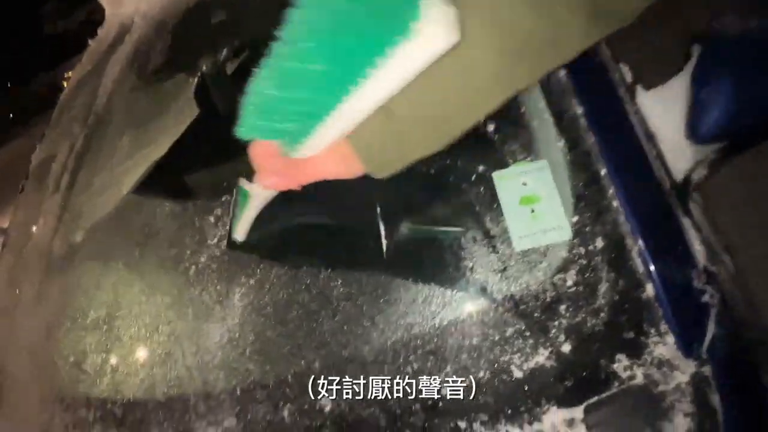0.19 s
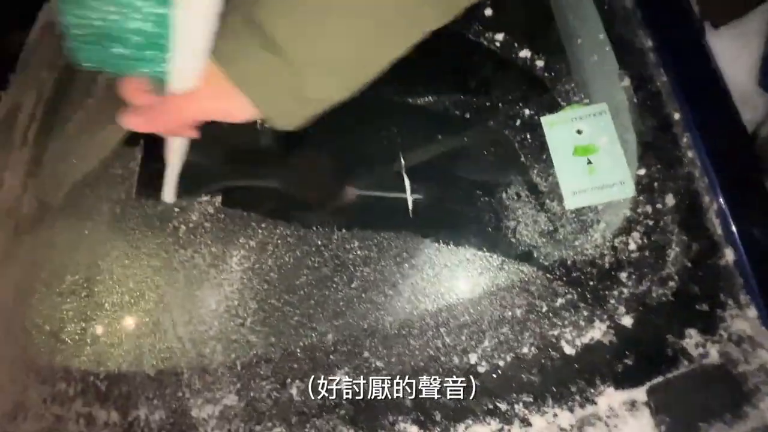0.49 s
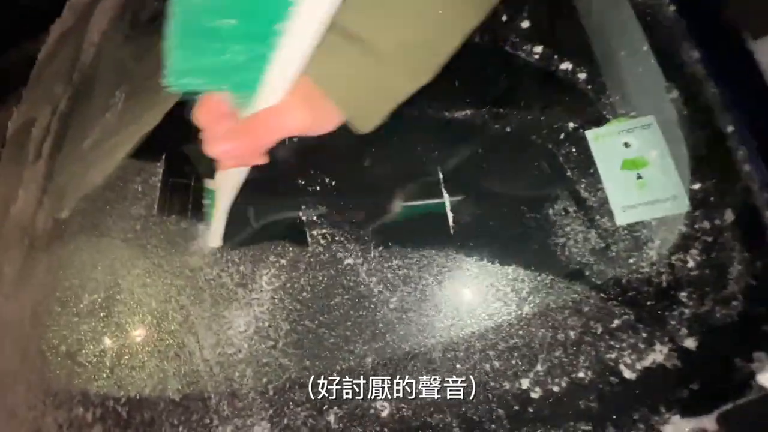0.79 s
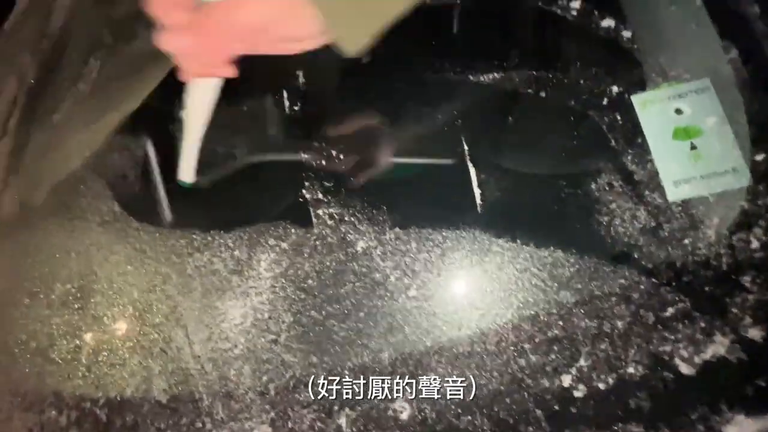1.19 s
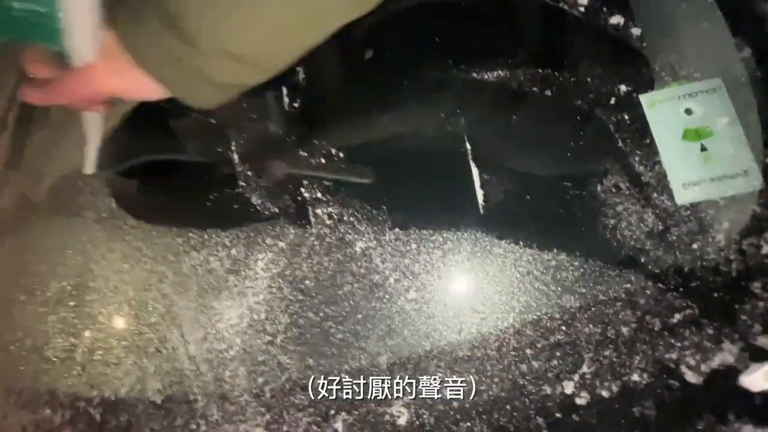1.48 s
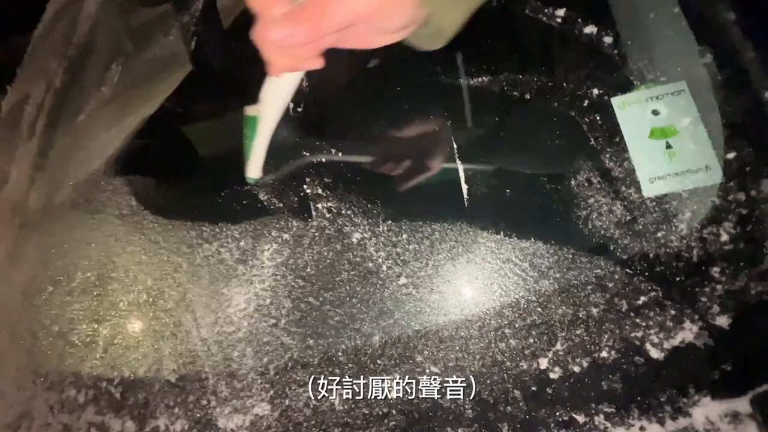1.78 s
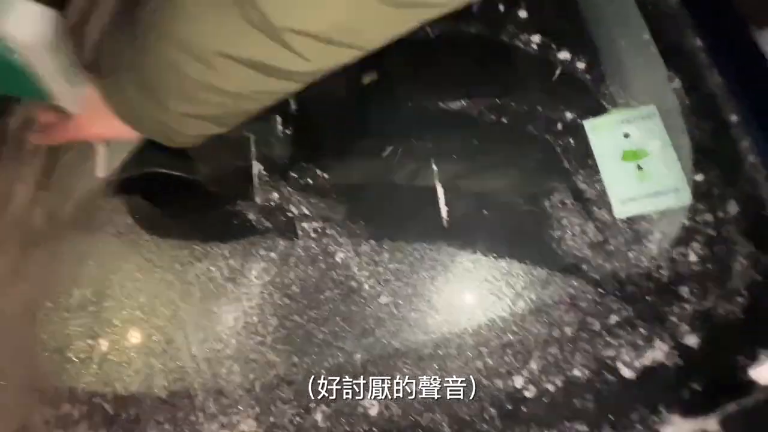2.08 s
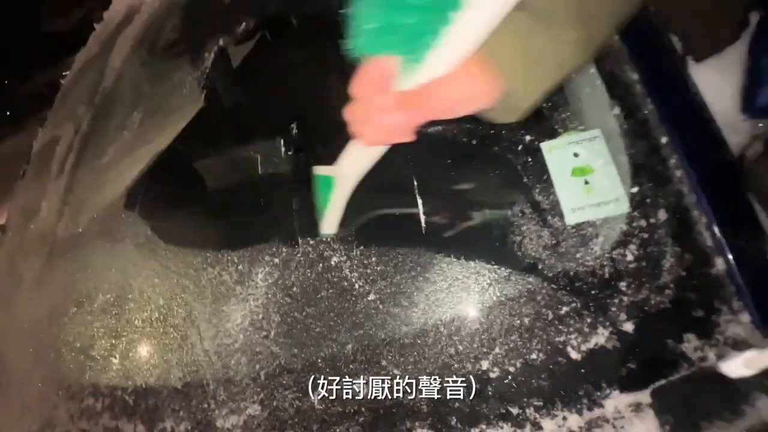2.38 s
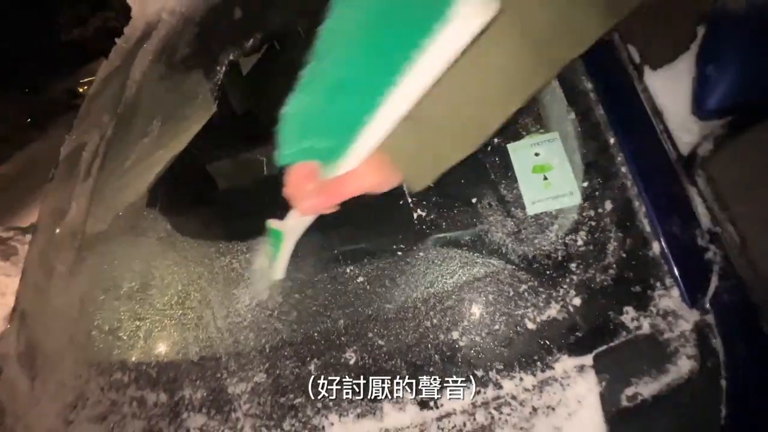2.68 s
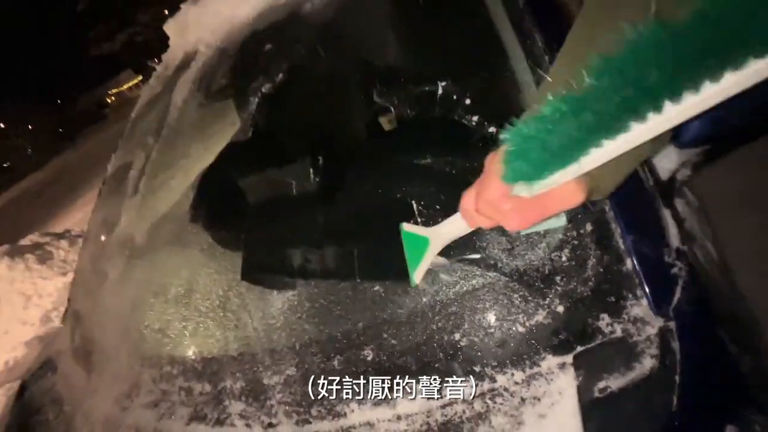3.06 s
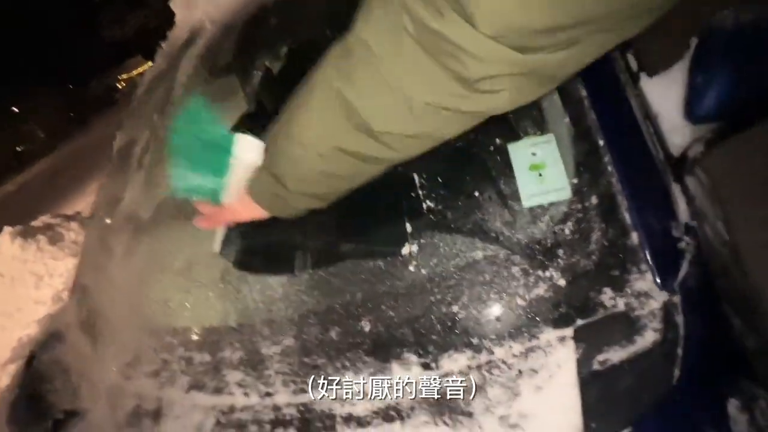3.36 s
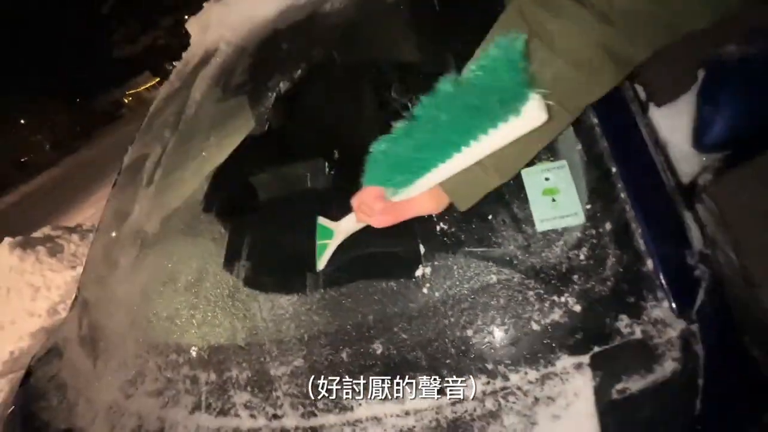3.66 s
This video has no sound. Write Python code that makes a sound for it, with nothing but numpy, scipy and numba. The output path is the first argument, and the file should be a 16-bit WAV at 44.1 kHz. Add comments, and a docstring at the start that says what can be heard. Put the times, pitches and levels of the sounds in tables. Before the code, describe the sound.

Close, dry stereo scraping of frost from car glass: fast gritty bursts with small cracking chips, weaker midway, sharpest near three seconds, ending shortly after three and a half. A steady low idle and soft outdoor rumble continue.

```python
"""Scraping frost off a windshield

A plastic scraper crosses the frost in short strokes, an arm's length from a phone.
Each stroke is a dense stream of random grains, cracking crystals, that ring the blade and shake the glass.
Chips tick in and between the strokes: bursts of noise that ring at their own pitch and die at once.
A car engine idles underneath as a few wavering tones; filtered noise makes street rumble and faint hiss."""
import sys
import numpy as np
from scipy import signal
from scipy.fft import rfft, irfft
from scipy.io import wavfile
from scipy.ndimage import uniform_filter1d
from numba import njit

SR = 44100
rng = np.random.default_rng(int(sys.argv[2]) if len(sys.argv) > 2 else 0)


def materialize(psi):
    """Save the field psi as 16-bit PCM at rate SR to the path in sys.argv[1].

    A 1-D psi becomes a single channel; in a 2-D psi each row is a channel.
    """
    bounded = np.clip(np.atleast_2d(psi).T, -1, 1)
    quanta = np.round(bounded * 32767).astype(np.int16)
    wavfile.write(sys.argv[1], SR, quanta)


N = 167580

# "Mid" is what both port signals share; "side" is what is opposed between them.

# Pitches of the idling engine. Each row: multiple of the firing rate, level in dB before the overall level.
IDLE_TONES = [(1, -15.5), (2, 2), (3, -3), (4, -13), (5, -34)]
IDLE_HZ, IDLE_DB, IDLE_WOBBLE = 35.29, -35.5, 0.00906  # firing rate, overall level, wobble as a share of the rate

# Tone colour of the street, shared and opposed. Each row: frequency in Hz, filter gain in dB.
STREET_MID = [(20, -28), (45, -0.5), (90, 0.5), (130, -1), (240, -3.5), (330, -7), (410, -6.5), (500, -17),
              (1500, -25.5), (2200, -59)]
STREET_SIDE = [(32, -21), (55, -12), (251, -5.5), (466, -4.5), (524, -7.5), (949, -9), (1020, -16.5),
               (4880, -23.5), (6810, -36), (10900, -21), (16000, -31)]
STREET_DB, STREET_SIDE_DB = -42, -48.5

# Tone colour of the faint hiss. Each row: frequency in Hz, filter gain in dB.
HISS_COLOUR = [(710, -18), (1200, -19.5), (1940, 7.5), (2360, -3.5), (2560, -1), (5250, -6.5), (6090, -2.5),
               (10900, -6), (13000, -28.5)]
# Level of the faint hiss over time. Each row: time in seconds, level in dB.
HISS_LEVEL = [(0.0, -57.5), (0.22, -44.5), (0.44, -52), (0.54, -59.5), (0.87, -40), (0.97, -54.5),
              (1.24, -54.5), (1.68, -56), (1.95, -54), (2.87, -52), (2.98, -69), (3.16, -45.5), (3.3, -59),
              (3.8, -54)]

# Scraper strokes, a list of rows for each. Each row: time in seconds, rasp level in dB,
# glass rumble level in dB, treble in dB against the rasp, low middle in dB against the rasp,
# main blade ring in Hz, upper body in dB against the rasp.
STROKES = [
    [(0.2, -102, -50, -18, -15, 2130, -14), (0.22, -27, -43, 7.5, -5.5, 2020, -3.5),
     (0.234, -28.5, -24.5, 1, -11, 2150, -17), (0.254, -39.5, -32, 9.5, 0, 2030, 7),
     (0.272, -38, -41, 6, -2, 1940, -2), (0.31, -34.5, -28, 4, -1.5, 2100, -0.5),
     (0.376, -42.5, -28.5, 5, 2, 1980, 5.5), (0.392, -85, -52, -8, 32, 2280, -10)],
    [(0.434, -51, -54, 7, -1, 2040, 5), (0.466, -32, -28, 7.5, -3.5, 1910, 0),
     (0.494, -42, -32, 8.5, 1.5, 2400, 7.5), (0.568, -23, -25.5, 2.5, 2, 2220, -7),
     (0.584, -51.5, -35, 13.5, -4, 2340, -1), (0.61, -36, -33, 3, 0, 2610, 6),
     (0.634, -48.5, -38.5, 1, 14.5, 2430, -11), (0.66, -86, -30, -18, -17, 2240, -10)],
    [(0.745, -56, -46, 14, 8, 2010, 7), (0.765, -38.5, -36, 6.5, -13, 2000, 1),
     (0.773, -42.5, -30.5, 16.5, 3.5, 1910, -2), (0.811, -36.5, -31, 6.5, -0.5, 1990, 1),
     (0.853, -45.5, -29, 20, 3, 2300, 7), (0.869, -35, -27, 10, -4, 2090, 7.5),
     (0.899, -25.5, -25.5, 5, -2.5, 1940, 2.5), (0.971, -51, -39.5, 6.5, -4, 2400, 5),
     (0.995, -49.5, -59, -5, -12, 2330, -5)],
    [(1.0, -65, -54, -4, -7, 2180, 6), (1.042, -36, -36, 4, -3.5, 1910, -6),
     (1.078, -36, -22.5, 9, 7, 1980, 4.5), (1.092, -34.5, -27, 4, -16, 2150, -2),
     (1.102, -32, -24.5, 7, -3, 1970, -3), (1.14, -21.5, -20, 0.5, -6, 2070, -10),
     (1.162, -27, -24.5, 5.5, 2, 2030, -1), (1.178, -59, -28, 5, -6, 2050, 5),
     (1.2, -72, -39, 13, -10, 2080, -1)],
    [(1.4, -80, -46, 4, 11, 2540, -10), (1.414, -59, -49, 9, -8, 2570, 4),
     (1.423, -42, -43, 12, -9, 2660, 12), (1.448, -38, -33.5, 11, -6, 1880, 13),
     (1.48, -35.5, -30.5, 1, -6, 2000, -3), (1.524, -41, -32.5, 3.5, -8, 2040, -2.5),
     (1.542, -72, -30, 5, 7, 2190, 9)],
    [(1.56, -58, -36, 4, -4, 2110, 1), (1.578, -47, -46, 3, -10, 2160, -7),
     (1.59, -30.5, -36, 1, -5, 2070, -16), (1.612, -32, -26, 7, -4, 1960, 2),
     (1.638, -32.5, -36, 1.5, -3, 1990, -2), (1.65, -44.5, -39, 11, 6.5, 2370, 5),
     (1.678, -57, -67, 9, -18, 2490, -3)],
    [(1.72, -60.5, -42.5, 19, 6, 2290, 6), (1.752, -65, -41.5, 16, -20, 2330, -5),
     (1.764, -31, -54, 1.5, -15, 2120, -4), (1.776, -62, -63, 7, -26, 2350, -9),
     (1.786, -42, -56, 1, -20, 2350, -16), (1.808, -59, -60, 10, -24, 2320, -17)],
    [(1.96, -84, -51, 7, -1, 2390, -11), (1.994, -53.5, -45, 14.5, -4, 2700, 13),
     (2.004, -53, -56, 8, -15, 2670, -6), (2.034, -55.5, -49, 9, 5, 2190, 9),
     (2.05, -58, -55, 10, -1, 1920, 5), (2.06, -38, -34, 1.5, -8, 1760, -2.5),
     (2.07, -46, -35.5, 4, -7, 1870, 0), (2.09, -64, -31.5, -12, 9, 1920, -7)],
    [(2.1, -83, -57, -14, 1, 2240, -11), (2.128, -47, -48, 13.5, -2, 2070, 2),
     (2.148, -35.5, -26.5, 3, -0.5, 1930, -2.5), (2.182, -49.5, -40, 7.5, -6, 2810, -3),
     (2.204, -27.5, -28, 8, 1, 3070, 4), (2.222, -30.5, -27, 0, -8, 2960, -4),
     (2.234, -77, -39, 20, 6, 2800, -10), (2.27, -82, -40, -2, 7, 2600, 4)],
    [(2.52, -63, -66, -14, -2, 1920, -6), (2.536, -38, -32.5, -4, -0.5, 1870, -19),
     (2.562, -55.5, -48, 1, -9, 1920, -9), (2.6, -35.5, -33, 2, -3, 1880, -8),
     (2.702, -18, -28, -5, -14.5, 2730, -11.5), (2.736, -32, -22, 6, -5, 2180, -3),
     (2.772, -29.5, -24, 0.5, -15, 1760, -6), (2.806, -45, -28.5, 7.5, 2, 1900, -12),
     (2.84, -98, -52, -42, -3, 1990, 0)],
    [(2.87, -58, -57, 3, -9, 2190, 10), (2.93, -41.5, -40.5, 4.5, -15, 2320, -23),
     (2.952, -17, -43.5, -0.5, -19, 2300, -17), (2.974, -20.5, -40, -2.5, -12, 2620, -6),
     (2.996, -34, -58, 9, -12, 2320, 0), (3.01, -14.5, -27.5, -15.5, -21, 2370, -35),
     (3.02, -35, -51, -0.5, -10, 2340, -22), (3.058, -45, -74, 1, -18, 2100, -12),
     (3.08, -67, -59, -25, 4, 2060, -11)],
    [(3.155, -68, -62, 0, 8, 2110, -10), (3.165, -41, -41, 5, -11, 1830, -1),
     (3.207, -33.5, -44.5, 1, -4.5, 1700, -2.5), (3.225, -27.5, -27, -3.5, -10, 1780, 0.5),
     (3.299, -31.5, -30.5, 3, -8, 1670, -11), (3.345, -24.5, -18, -1, -2.5, 1860, -5),
     (3.385, -32.5, -21.5, 3.5, -6.5, 1600, -14), (3.411, -57, -26, 0, 14, 1810, -7),
     (3.43, -71, -45, -19, -2, 1770, -20)],
    [(3.495, -57, -65, -15, 4, 1750, -22), (3.509, -64, -40, 3, -5, 1800, 1),
     (3.523, -21, -29.5, 3.5, -8, 1710, -3), (3.531, -18, -34.5, -7.5, -9, 1760, -11),
     (3.549, -99, -32.5, -5, -2, 1960, 0)],
]
# Tone colour of the rasp, shared and opposed. Each row: frequency in Hz, filter gain in dB.
RASP_MID = [(290, -49.5), (500, -1), (1120, -2.5), (2010, 2.5), (2730, 1), (4760, -1.5), (5930, 0),
            (10500, -3), (11400, -7), (12000, -26), (12500, -50), (15800, -79.5), (16500, -77)]
RASP_SIDE = [(180, -50), (300, -28), (577, -5), (1770, -14), (2000, -6.5), (2610, -5), (3300, 2),
             (4030, -4), (4930, -1.5), (6450, -13), (10900, -4), (15700, -14.5), (16500, -54)]
SIDE_DB, SHARED = 2, 0.55  # gain of the side, and how much of its grains it has in common with the mid

# Tone colour of the shaken glass. Each row: frequency in Hz, filter gain in dB.
GLASS = [(35, -41), (60, -3), (97, -2.5), (199, 1.5), (280, -2), (417, -2.5), (534, -11.5), (579, -13),
         (900, -25), (1170, -55), (1980, -120)]
GLASS_SIDE_DB = -15

GRAINS_PER_S, GRAIN_SCATTER_DB, GRAIN_TOP_DB = 14000, 4, 22.5
JUDDER_HZ, JUDDER_DB = 109.4, 1  # random unevenness of the push
LURCH_HZ, LURCH_DB, LURCH_WANDER = 72, 1.5, 0.29  # the edge sticks and slips; wander is a share of the rate
LOW_SPLIT_HZ, MID_SPLIT_HZ, SPLIT_HZ = 1400, 3080, 5000  # borders of the four bands

# Rings that hover around one pitch, the first of the glass, the rest of blade and handle.
# Each row: middle frequency in Hz, width in Hz, middle gain in dB.
STEADY_RINGS = [(215, 44, -2.5), (1258, 24, 0), (5530, 500, -4.5), (6190, 440, -1.5), (8130, 2500, -5.5)]
DRIFT, PATCH_DB, PATCH_HZ = .04, 3, 20  # pitch drift as a share; swelling of the rings as the grip shifts
# Rings that move as the blade travels and bends.
# Each row: time in seconds, glass ring in Hz, handle ring in Hz, edge ring in Hz.
MOVING_PITCH = [(.25, 335, 685, 3700), (.35, 365, 610, 3570), (.5, 188, 730, 4300), (.8, 224, 706, 3550),
                (.9, 318, 1115, 3670), (1.07, 210, 865, 3400), (1.13, 248, 990, 3720),
                (1.44, 274, 1030, 3640), (1.51, 316, 1000, 3350), (1.62, 175, 1125, 3380),
                (2.18, 273, 1270, 3390), (2.64, 205, 1190, 3000), (2.719, 156, 710, 4350),
                (2.98, 200, 790, 3110), (3.21, 218, 1260, 4030), (3.3, 203, 614, 3950)]
# Shape of those rings, in the order glass, handle, edge. Each row: width in Hz, middle gain in dB.
MOVING_SHAPE = [(110, 1), (170, 8.5), (330, 4)]
MAIN_RING_WIDTH_HZ, MAIN_RING_DB = 220, 6.5

# Chips and knocks of the edge. Each row: time in seconds, level in dB before colouring,
# ring in Hz, broadband crack in dB against the ring.
TICKS = [(0.229, -11, 6000, 16), (0.2653, -16.5, 5460, -2), (0.415, -27, 7440, 3), (0.4467, -14, 7700, 7),
         (0.464, -13.5, 1800, 5), (0.483, -12, 2300, 9), (0.5035, -2.5, 3430, 36), (0.5225, -10.5, 2330, 7),
         (0.538, -18, 2300, -3), (0.5479, -5, 2180, -5), (0.5663, -11, 2690, -2), (0.607, -7.5, 2870, 7),
         (0.6245, -11.5, 1144, -3), (0.6679, -26, 2100, -4), (0.6818, -27, 2500, 2), (0.702, -32, 2000, 8),
         (0.73, -27.5, 2030, 19), (0.765, -15, 6600, 4), (0.8121, -12, 3700, 0), (1.035, -24, 2000, 4),
         (1.2033, -25, 2330, 32), (1.221, -29.5, 1900, 30), (1.2413, -21.5, 5640, 6),
         (1.6053, -7.5, 3360, 1), (1.725, -34, 3630, 7), (1.748, -17, 4950, 1), (2.0214, -22, 7100, -5),
         (2.058, -32, 1740, 12), (2.3365, -28, 2290, 8), (2.3454, -7, 2420, 1), (2.363, -32, 2480, 10),
         (2.3715, -2, 2300, 0), (2.4859, -21, 6000, 17), (2.532, -30, 1800, 2), (2.9121, -17, 2120, 25),
         (2.9501, -7, 2400, 4), (3.007, -7.5, 2440, 0), (3.139, -21.5, 2670, -5), (3.1637, -20, 5930, 4),
         (3.241, -10, 2000, 5), (3.2755, -11, 5800, 16), (3.338, -11, 1500, 2), (3.6052, -26.5, 6140, 24),
         (3.614, -25.5, 2230, 8), (3.6604, -31, 2370, -23)]
TICK_T60_S, TICK_RISE_S, TICK_RING_WIDTH_HZ = 0.0064, 0.0018, 1200

TAIL_T60_S, TAIL_DB = 0.11, -18.5  # reflections from glass and bonnet
LEAN_HZ, LEAN_WIDTH_HZ, LEAN = 640, 210, 0.47  # a band that leans to the right
TOP_HZ = 15900


def undb(db):
    """Turns decibels into a plain multiplier."""
    return 10 ** (np.asarray(db) / 20)


def unit(x):
    """Scales a sound to an average (RMS) strength of 1."""
    return x / np.sqrt(np.mean(x ** 2))


def colour(x, table, size=2048):
    """Filters with the gain of a (Hz, dB) table, never sounding ahead of its input."""
    hz, db = np.array(table, float).T
    f = np.maximum(np.fft.rfftfreq(size, 1 / SR), 1)
    log_gain = np.interp(np.log(f), np.log(hz), db) * np.log(10) / 20
    # folding the cepstrum (transform of the log gain) forward in time gives minimum phase
    cepstrum = irfft(log_gain)
    cepstrum[1:size // 2] *= 2
    cepstrum[size // 2 + 1:] = 0
    return signal.fftconvolve(x, irfft(np.exp(rfft(cepstrum))))[:N]


@njit
def ring(x, hz, width, sr):
    """A resonance: a band-pass whose centre may move, with gain 1 at the centre."""
    y, band, low = np.empty(len(x)), 0., 0.
    for i in range(len(x)):
        g, k = np.tan(np.pi * hz[i] / sr), width / hz[i]
        v = (band + g * (x[i] - low)) / (1 + g * (g + k))
        band, low, y[i] = 2 * v - band, low + 2 * g * v, k * v
    return y


def fixed_ring(x, hz, width):
    """A resonance that stays at one pitch."""
    return ring(x, np.full(len(x), 1. * hz), 1. * width, 1. * SR)


def walk(rate):
    """A smooth random wander around 0 with spread 1: new values at this rate per second."""
    k = int(SR / rate)
    steps = np.repeat(rng.standard_normal(N // k + 1), k)
    return unit(uniform_filter1d(uniform_filter1d(steps, k), k)[:N])


def engine():
    """Idle hum: multiples of the firing rate, sharing one pitch wobble, each wavering in level."""
    rate = IDLE_HZ * (1 + IDLE_WOBBLE * walk(3.164))
    phase = 2 * np.pi * np.cumsum(rate) / SR
    return undb(IDLE_DB) * sum(undb(db + walk(7.1)) * np.cos(k * phase) for k, db in IDLE_TONES)


def flickering_noise(table, db, flicker_db):
    """Coloured noise whose level swells and flickers at random."""
    noise = unit(colour(rng.standard_normal(N), table, size=8192))
    return noise * undb(db + flicker_db * walk(15))


def street():
    """Street noise: separate coloured noises for mid and side make it wide."""
    mid = flickering_noise(STREET_MID, STREET_DB, 3.1)
    return mid, flickering_noise(STREET_SIDE, STREET_SIDE_DB, 1.2)


def hiss():
    """Faint hiss: coloured noise that follows a level curve and flickers."""
    s, db = np.array(HISS_LEVEL).T
    return flickering_noise(HISS_COLOUR, np.interp(np.arange(N) / SR, s, db), 3.6)


def control(column, rest):
    """One column of all strokes over time, at rest between strokes, smoothed over 2 ms."""
    t, out = np.arange(N) / SR, np.full(N, float(rest))
    for stroke in STROKES:
        s = np.array(stroke, float)
        inside = (t >= s[0, 0]) & (t <= s[-1, 0])
        out[inside] = np.interp(t[inside], s[:, 0], s[:, column])
    return uniform_filter1d(out, size=89)


def grains():
    """Crystals breaking at random moments as clicks of either sign, a few much larger than the rest."""
    chance = rng.random((3, N))
    breaks = chance[0] < GRAINS_PER_S / SR
    size_db = np.minimum(-GRAIN_SCATTER_DB * np.log(chance[1] + 1e-9), GRAIN_TOP_DB)
    return unit(breaks * undb(size_db) * np.sign(chance[2] - .5))


def chatter():
    """Stick-slip in dB: an uneven beat whose depth comes and goes."""
    rate = LURCH_HZ * np.clip(1 + LURCH_WANDER * walk(15), .4, 2)
    beat = np.cos(2 * np.pi * np.cumsum(rate) / SR)
    return LURCH_DB * beat * np.clip(1 + 1.04 * walk(6.8), 0, 2)


def resonances():
    """Rings of glass, then of blade, handle and edge, each (centre over time, width, gain over time)."""
    def swell(db):
        return undb(db + PATCH_DB * walk(PATCH_HZ))

    steady = [(hz * np.clip(1 + DRIFT * walk(5.27), .7, 1.3), width, swell(db))
              for hz, width, db in STEADY_RINGS]
    s, *pitches = np.array(MOVING_PITCH, float).T
    moving = [(np.interp(np.arange(N) / SR, s, hz), width, swell(db))
              for hz, (width, db) in zip(pitches, MOVING_SHAPE)]
    main = (control(column=5, rest=2200), MAIN_RING_WIDTH_HZ, undb(MAIN_RING_DB))
    glass_rings = [moving[0], steady[0]]
    return glass_rings, steady[1:] + moving[1:] + [main]


def add_rings(x, rings):
    """A struck body answers at its own pitches: the sound plus its rings."""
    return x + sum(gain * ring(x, hz, 1. * width, 1. * SR) for hz, width, gain in rings)


def bands(x):
    """Splits into low middle, body, upper body and treble, which add up to the sound again."""
    below = []
    for hz in (LOW_SPLIT_HZ, MID_SPLIT_HZ, SPLIT_HZ):
        below.append(signal.sosfiltfilt(signal.butter(3, hz, fs=SR, output="sos"), x))
    a, b, c = below
    return np.array([a, b - a, c - b, x - c])


def lagged(x):
    """The mid sound as the side carries it: a quarter cycle late, in the side's colour."""
    f = np.log(np.maximum(np.fft.rfftfreq(N, 1 / SR), 1))
    mid_db, side_db = (np.interp(f, np.log(hz), db)
                       for hz, db in (np.array(table).T for table in (RASP_MID, RASP_SIDE)))
    return irfft(-1j * rfft(x) * undb(side_db - mid_db), N)


def rasp(rings):
    """Grains ring the blade, then follow the stroke levels band by band, juddering; mid and side."""
    push = undb(control(column=1, rest=-96) + JUDDER_DB * walk(JUDDER_HZ) + chatter())
    # in the order of the bands; the body itself is the reference
    tilt = undb([control(column=4, rest=1), np.zeros(N),
                 control(column=6, rest=0), control(column=3, rest=0)])
    mid = colour(grains(), RASP_MID)
    own = colour(grains(), RASP_SIDE)
    side = (SHARED * lagged(mid) + np.sqrt(1 - SHARED ** 2) * own) * undb(SIDE_DB)
    parts = [bands(add_rings(x, rings)) for x in (mid, side)]
    # both are scaled by the mid's bands, so the side keeps its balance against the mid
    norm = parts[0].std(axis=1, keepdims=True)
    return [(part / norm * tilt).sum(axis=0) * push for part in parts]


def glass_rumble(rings):
    """Fresh grains in the colour of the glass, ringing it and following the strokes; mid and side."""
    shake = undb(control(column=2, rest=-94) + JUDDER_DB * walk(JUDDER_HZ / 2))
    return [unit(add_rings(colour(grains(), GLASS), rings)) * shake * undb(db) for db in (0, GLASS_SIDE_DB)]


def ticks():
    """Chips: short noise cracks that ring at their own pitch, in the rasp's colour; mid and side."""
    length = 2048
    out, t = np.zeros(N + length), np.arange(length) / SR
    shape = undb(-60 * t / TICK_T60_S) * (1 - np.exp(-(t / TICK_RISE_S) ** 2))
    for s, db, hz, broad_db in TICKS:
        crack = rng.standard_normal(length) * shape
        rung = fixed_ring(crack, hz, TICK_RING_WIDTH_HZ)
        chip = unit(rung) + undb(broad_db) * unit(crack)
        strength = np.sqrt(np.mean(chip[:132] ** 2))  # over the first 3 ms
        i = int(s * SR)
        out[i:i + length] += chip / strength / 3 * undb(db)  # peaks reach about three times the RMS
    chips = out[:N]
    mid = colour(chips, RASP_MID)
    mid = mid * np.std(chips) / np.std(mid)
    return mid, lagged(mid) * undb(SIDE_DB)


def reflections(x):
    """Glass and bonnet throw the sound back: a dying tail of noise smears it."""
    t = np.arange(6000) / SR
    tail = rng.standard_normal(6000) * undb(-60 * t / TAIL_T60_S)
    tail = tail / np.sqrt(np.sum(tail ** 2)) * undb(TAIL_DB)
    return [signal.fftconvolve(signal_in, tail)[:N] for signal_in in x]


def scraper():
    """Rasp and chips with their reflections, over the shaken glass; mid and side."""
    glass_rings, blade_rings = resonances()
    direct = [scrape + chip for scrape, chip in zip(rasp(blade_rings), ticks())]
    mid, side = (sum(layers) for layers in zip(direct, reflections(direct), glass_rumble(glass_rings)))
    side = side - LEAN * fixed_ring(mid, LEAN_HZ, LEAN_WIDTH_HZ)  # leans that band to the right
    return mid, side


def scene():
    """Adds all sources and turns mid and side into left and right."""
    street_mid, street_side = street()
    scraper_mid, scraper_side = scraper()
    mid = engine() + street_mid + hiss() + scraper_mid
    side = street_side + scraper_side
    return np.array([mid + side, mid - side])


def record(dry):
    """The phone rounds the loudest peaks and cuts the top."""
    rounded = .9 * np.tanh(dry / .9)
    return signal.sosfilt(signal.ellip(8, .2, 80, TOP_HZ, fs=SR, output="sos"), rounded)


dry = scene()
out = record(dry)
materialize(out)
```